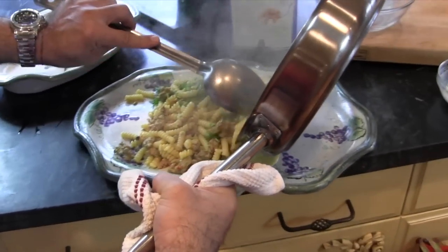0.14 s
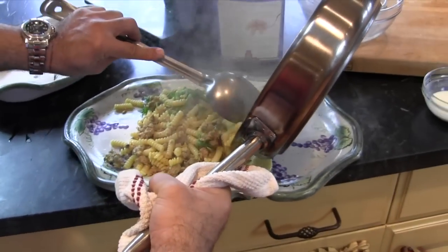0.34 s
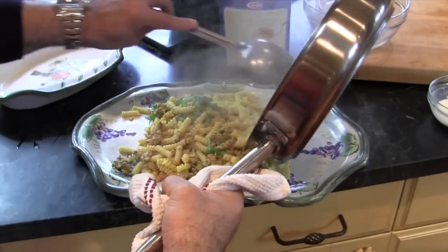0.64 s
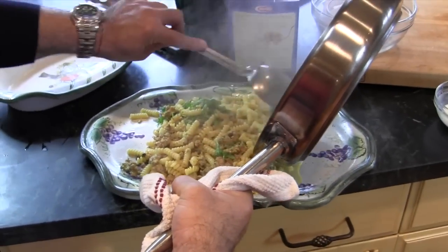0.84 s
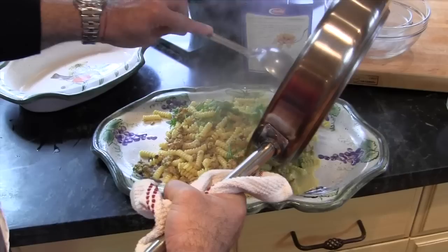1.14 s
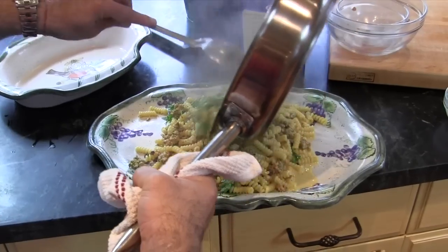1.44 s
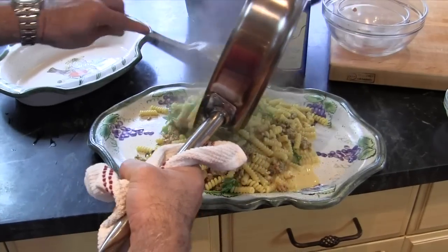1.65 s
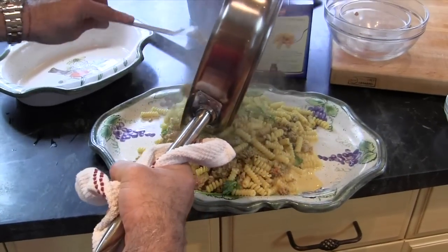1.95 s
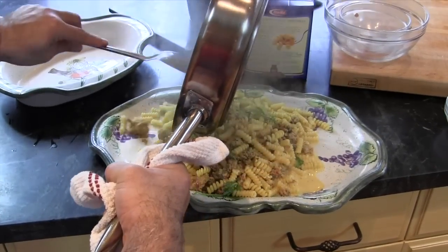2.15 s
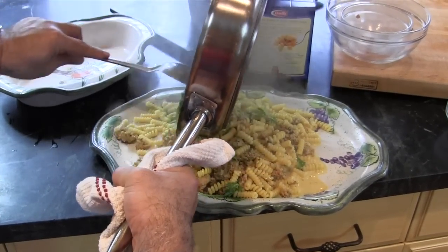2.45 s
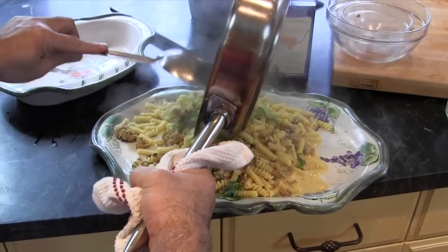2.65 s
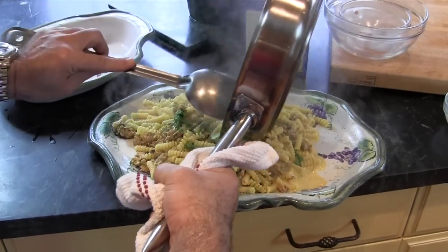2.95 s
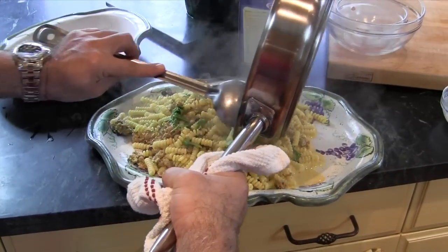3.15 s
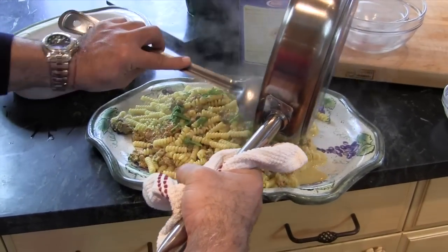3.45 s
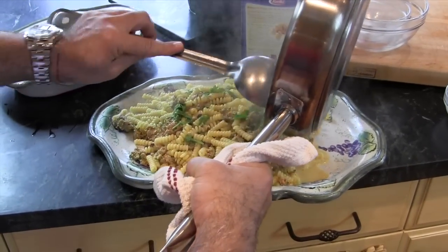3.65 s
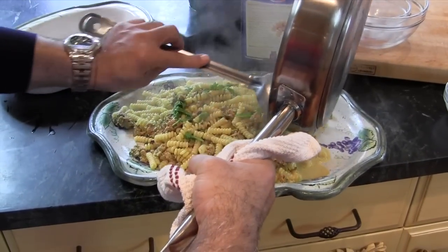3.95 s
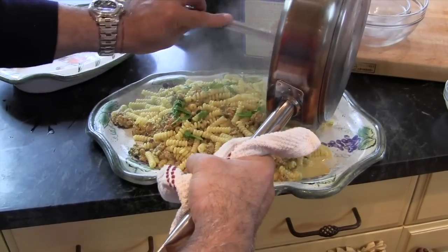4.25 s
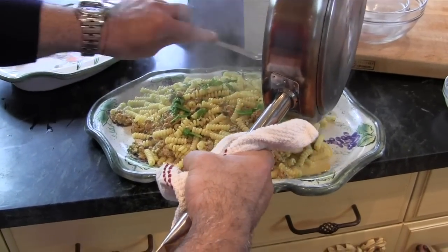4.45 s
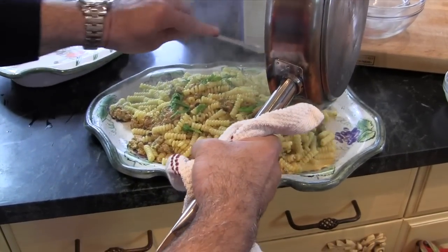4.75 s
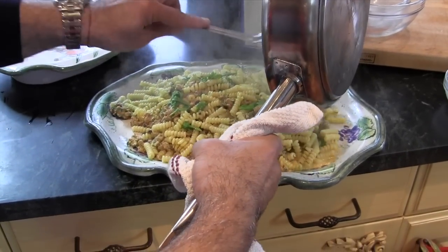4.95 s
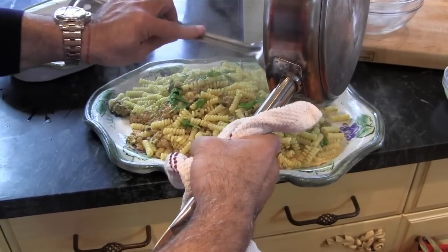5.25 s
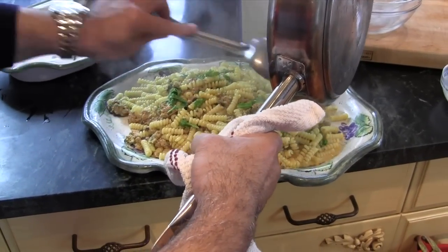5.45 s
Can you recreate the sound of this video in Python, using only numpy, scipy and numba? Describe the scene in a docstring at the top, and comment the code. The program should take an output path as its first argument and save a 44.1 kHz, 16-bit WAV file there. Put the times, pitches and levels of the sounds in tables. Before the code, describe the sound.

In a small hard-surfaced kitchen, close to the camera, about two seconds of quiet pass with soft wet pasta ticks and dull dish nudges on a counter. Then a metal ladle strikes a tilted steel pan in sharp, irregular clanks, with short gritty scrapes following many blows. The clanks become denser and brighter toward the end, over faint hiss and low hum.

```python
"""A metal ladle knocks on and scrapes along a tilted steel pan in a small hard kitchen, a metre from a camera.
Blows are short bursts of force and scrapes are stick-slip noise; both drive one bank of decaying pan modes.
Before most of the blows pasta slides with wet ticks, summed from tiny partials, and nudges ring the dish on
the counter as a few low modes. Under it all lie a quiet filtered-noise hiss and a narrow appliance hum."""
import sys
import numpy as np
from scipy import signal
from scipy.fft import rfft, irfft
from scipy.io import wavfile
from scipy.ndimage import uniform_filter1d
from numba import njit

SR = 44100
rng = np.random.default_rng(int(sys.argv[2]) if len(sys.argv) > 2 else 0)


def how_loud(loudness_db):
    """Turn decibels into a plain amplitude multiplier (0 dB gives 1, 20 dB gives 10)."""
    steps = np.asarray(loudness_db, float) / 20
    return 10 ** steps


def to_wav(sig):
    """Store sig (one row per channel, or 1-D mono) as 16-bit WAV at the path in sys.argv[1].

    Samples outside -1..1 are clipped; the rate is SR.
    """
    pcm = np.clip(np.atleast_2d(sig), -1, 1) * 32767
    pcm = np.round(pcm).astype(np.int16)
    wavfile.write(sys.argv[1], SR, pcm.T)  # frames by channels


N = 246959


def read(table, hz, axis=1):
    """Interpolation on a logarithmic frequency axis: one column of a table at the given frequencies."""
    rows = np.array(table, float)
    return np.interp(np.log(np.maximum(hz, 1.0)), np.log(rows[:, 0]), rows[:, axis])


def colour(x, table):
    """Zero-phase filtering: multiply the spectrum by a curve of (frequency [Hz], level [dB])."""
    n = x.shape[-1]
    hz = np.arange(n // 2 + 1) * SR / n
    return irfft(rfft(x) * how_loud(read(table, hz)), n)


def set_rms(x, db):
    """Root-mean-square normalisation to a level in dB."""
    return x * how_loud(db) / np.sqrt(np.mean(x ** 2))


def walk(rate):
    """Smoothed random process: levels held for 1 / rate seconds, then slewed; spread near 1."""
    hold = int(SR / rate)
    steps = np.repeat(rng.standard_normal(N // hold + 1), hold)
    return 0.87 * uniform_filter1d(uniform_filter1d(steps, hold), hold)[:N]


@njit
def ring(force, poles, weights):
    """Modal superposition: decaying resonators, each driven by its own mix of the force rows."""
    out = np.zeros(force.shape[1])
    for m in range(len(poles)):
        push = np.full(len(out), 1e-18)
        for b in range(len(force)):
            if weights[m, b] != 0:
                push += weights[m, b] * force[b]
        z = 0j
        for i in range(len(out)):
            z = z * poles[m] + push[i]
            out[i] += z.imag
    return out


def poles_of(hz, t60):
    """Exponential decay: the complex turn and shrinkage of each mode in one sample."""
    return np.exp(2j * np.pi * hz / SR - np.log(1000) / (t60 * SR))


def burst(seconds, size=512):
    """Contact chatter: noise of unit energy that decays by 1/e in the given time."""
    chatter = rng.standard_normal(size) * np.exp(-np.arange(size) / (seconds * SR))
    return chatter / np.sqrt(np.sum(chatter ** 2))


# spectrum of the room hiss: (frequency [Hz], relative level [dB per Hz])
HISS_SPECTRUM = [(15, -53), (25, -41.5), (70, -32.5), (114, -5), (195, 3), (503, -2), (677, -2.5),
                 (1160, -5.5), (2110, -7.5), (2760, -10.5), (4030, -11), (13600, -23.5), (16000, -35)]


def kitchen():
    """Filtered noise and a resonance fed by noise: drifting hiss and wavering hum, nearly alike left and right."""
    hiss_db = -59
    drift = how_loud(0.8 * walk(4) + 0.7 * walk(20))
    mid, side = colour(rng.standard_normal((2, N)), HISS_SPECTRUM) * drift
    # a 128 Hz mode with a decay time of 0.4875 s
    hum_pole = poles_of(np.array([128]), np.array([0.4875]))
    hum = ring(rng.standard_normal((1, N)), hum_pole, np.ones((1, 1)))
    mid = set_rms(mid, hiss_db) + set_rms(hum, -69.5)
    side = set_rms(side, hiss_db - 6.5)
    return np.array([mid + side, mid - side])


# dull nudges of the dish on the counter: (time [s], force level [dB])
NUDGES = [(0.039, -47), (0.089, -39.5), (0.282, -45.5), (0.57, -35.5), (0.589, -34.5), (0.612, -34.5),
          (0.636, -33), (0.655, -38.5), (0.674, -44), (0.715, -40), (1.099, -43), (1.36, -44), (1.892, -41),
          (2.763, -45)]
# low modes of dish and counter: (frequency [Hz], level [dB], decay time t60 [s])
DISH_MODES = [(140, -7.5, .15), (262, -12.5, 0.098), (358, -15, 0.031), (606, -8, 0.049),
              (677, -13.5, 0.17), (850, -19.5, 0.036), (1790, -17, 0.024)]


def dish():
    """Impulsive excitation of modes: soft nudges ring the low modes of dish and counter."""
    force = np.zeros((1, N))
    for s, force_db in NUDGES:
        i = int(s * SR)
        force[0, i:i + 512] += how_loud(force_db) * burst(0.007)
    hz, db, t60 = np.array(DISH_MODES, float).T
    return ring(force, poles_of(hz, t60), how_loud(db).reshape(-1, 1))


# wet ticks of sliding pasta: (time [s], level of the main partial [dB], centre frequency [Hz], decay time t60 [s])
TICKS = [(0.0409, -44.5, 1760, 0.0088), (0.3808, -45, 1540, 0.0086), (0.4828, -52.5, 6260, 0.015),
         (0.5713, -43.5, 1730, 0.0069), (0.6733, -40.5, 3100, 0.013), (1.127, -48, 2390, 0.014),
         (1.4088, -43, 2900, 0.017), (1.6154, -36, 3100, 0.012), (1.6198, -39, 2070, 0.0084),
         (1.6287, -39, 3650, 0.009), (1.7397, -37.5, 3370, 0.01), (1.77, -48.5, 2330, 0.015),
         (1.929, -47.5, 8000, 0.012), (1.9444, -49, 3390, 0.0089)]


def pasta():
    """Additive synthesis: each wet tick is a cluster of tiny decaying partials; 60 faint ones fall at random."""
    out, t = np.zeros(N), np.arange(2048) / SR
    draws = rng.random((60, 3))
    faint = [(2.3 * a, -66 + 9 * b, 1500 * how_loud(8.9 * c), 0.008) for a, b, c in draws]
    for s, tick_db, hz, t60 in list(TICKS) + faint:
        partials = np.minimum(hz * np.array([0.62, 0.8, 1, 1.17, 1.55, 2.2]), 15000)
        sizes = np.array([0.33, 0.55, 1, 0.6, 0.46, 0.15]) * rng.choice([-1.0, 1.0], 6)
        tone = sizes @ np.sin(2 * np.pi * partials[:, None] * t)
        decay = np.exp(-np.log(1000) * t / t60)
        i = int(s * SR)
        out[i:i + len(t)] += how_loud(tick_db) * tone * decay
    return out


# reverberation of the kitchen: (frequency [Hz], decay time t60 [s])
ROOM_T60 = [(200, 0.38), (600, 0.66), (1500, 0.49), (4000, 0.51), (10000, 0.32)]
# left-right difference of the reverberation: (frequency [Hz], level [dB])
SIDE_TILT = [(100, -7), (1500, -9.5), (5000, -3.5), (12000, 1.5)]


def room(x):
    """Diffuse reverberation: direct sound plus a noise tail whose bands each decay at their own rate."""
    size = SR * 3 // 4
    t, hz = np.arange(size) / SR, np.arange(size // 2 + 1) * SR / size
    noise, tail = rfft(rng.standard_normal((2, size))), 0
    centres = np.log([row[0] for row in ROOM_T60])
    for (_, t60), row in zip(ROOM_T60, np.eye(len(ROOM_T60))):
        band = irfft(noise * np.interp(np.log(hz + 1), centres, row), size)
        tail = tail + band * np.exp(-np.log(1000) * t / t60)
    # the first walls answer after a few ms
    tail = tail * np.clip((t - 0.002) / 0.0024, 0, 1)
    mid, side = tail / np.sqrt(np.sum(tail[0] ** 2))
    wet_mid = how_loud(-5.5) * signal.fftconvolve(x, mid)[:N]
    wet_side = how_loud(-12) * colour(signal.fftconvolve(x, side)[:N], SIDE_TILT)
    return np.array([x + wet_mid + wet_side, x + wet_mid - wet_side])


# bands in which a contact's force is set: centre frequency [Hz]
BANDS_HZ = [600, 1750, 2900, 4900, 9500]
# swing of each band with the place of contact: size [dB]; place where it is strongest [degrees]
BAND_PLACE_DB = [1.38, 0.1, 2.43, 1, 1.2]
BAND_BEST_DEG = [165, 200, 13, 222, 240]


def band_db(base_db, tilt, degrees):
    """Contact spectrum: a common colour, tilted by hardness and swung by the place on the pan."""
    octaves = np.log2(np.array(BANDS_HZ) / BANDS_HZ[1])
    angle = np.radians(np.subtract.outer(degrees, BAND_BEST_DEG))
    return np.array(base_db) + tilt * octaves + np.array(BAND_PLACE_DB) * np.cos(angle)


CROWD_PER_RING = -0.24  # dB per dB of clear ring: a free pan clatters less
# ladle blows: (time [s], force level [dB], hardness as treble tilt [dB per octave], clear ring [dB],
# place round the pan [degrees])
BLOWS = [(2.0791, -11.5, -1.5, -7, 96), (2.4494, -11, -0.3, -2, 48), (3.1493, -11, 0.04, -6, 127),
         (3.2095, -27, -1.76, 12, 5), (3.4223, -23, 0.66, 5, 354), (3.8186, -12, 1.17, -8, 112),
         (3.985, -35, 0.3, -12.5, 390), (4.0993, -26.5, -4.5, -0.1, 270), (4.3818, -15, 2.43, 1.5, 350),
         (4.466, -28, 0, 7.5, 310), (4.524, -25.5, -0.7, 5.5, 300), (4.7819, -12, 0.27, 1.5, 238),
         (5.1243, -18, 2.1, 5.5, 5), (5.219, -22.5, 0.5, 2.5, 234), (5.4586, -11, 1.2, 5, 228)]
# colour of a blow before the tilt: level per band [dB]
BLOW_COLOUR_DB = [-13.5, 0.5, -2, -3, -6]


def blows():
    """Impact excitation: a sharp push and chatter per blow, the crack, and the contact's place and clear ring."""
    slide_deg_s, crack_s = 90, 0.0017
    force, crack = np.zeros((N, 5)), np.zeros(N)
    place, ring_db = np.zeros(N), np.zeros((N, 1))
    for s, force_db, tilt, clear_db, degrees in BLOWS:
        i = int(s * SR)
        # the ladle drags on from where it landed
        place[i:] = degrees + slide_deg_s * np.arange(N - i) / SR
        ring_db[i:] = clear_db
        bands = how_loud(force_db + band_db(BLOW_COLOUR_DB, tilt, degrees))
        push = 0.86 * burst(0.003)
        push[0] += 1
        force[i:i + 512] += push[:, None] * bands
        # the crack follows the three upper bands
        crack_size = np.sqrt(crack_s * SR * np.sum(bands[2:] ** 2)) * how_loud(CROWD_PER_RING * clear_db)
        crack[i:i + 512] += burst(crack_s) * crack_size
    snap = colour(crack, [(300, -21), (1200, -42), (4500, -1.0), (9000, -3.5), (16000, -37.5)])
    return force, how_loud(-2) * snap, place, ring_db


def shake(hz, db, t60, best, blow, drag, place, depth):
    """Modal excitation by blows and rubbing given per band; the place of contact picks the modes."""
    gain = how_loud(db) * rng.choice([-1.0, 1.0], len(hz))
    # each mode belongs to the two nearest bands
    share = np.transpose([np.interp(np.log(hz), np.log(BANDS_HZ), row) for row in np.eye(5)])
    share = share * gain[:, None]
    # a blow is felt by mode size, a steady rub also by how long the mode rings
    struck = blow / np.sqrt(np.sum(share ** 2, axis=0))
    ring_samples = t60[:, None] * SR / (4 * np.log(1000))
    rubbed = drag / np.sqrt(np.sum(share ** 2 * ring_samples, axis=0))
    force = (struck + rubbed).T
    # each mode feels 1 + depth * cos(place - best), written out as three parts
    here, best = np.radians(place), np.radians(best)[:, None]
    force = np.vstack([force, force * np.cos(here), force * np.sin(here)])
    share = np.hstack([share, depth * share * np.cos(best), depth * share * np.sin(best)])
    return ring(np.ascontiguousarray(force), poles_of(hz, t60), np.ascontiguousarray(share))


# short pan modes, spread over the range and louder in a few regions:
# (frequency [Hz], level of each mode [dB], decay time t60 [s])
CROWD = [(260, -26.5, 0.044), (710, -14, 0.076), (1230, -4.5, 0.029), (1550, 2, 0.051), (2020, 6.5, 0.032),
         (2340, -2, 0.026), (3100, 1.5, 0.057), (3770, -2, 0.03), (4750, 8.5, 0.053), (5660, -1, 0.049),
         (6600, -2, 0.067), (7050, -5.5, 0.041), (8400, -9, 0.056), (11500, -15.5, 0.076),
         (13000, -19, 0.031), (14800, -32, .015), (16000, -43.5, 0.014)]


def crowded_modes(blow, drag, place, ring_db):
    """High modal density: 240 short modes clatter, less under blows that leave the pan free to ring."""
    hz = 250 + 15700 * ((np.arange(240) + rng.random(240)) / 240) ** 1.4
    db, t60 = read(CROWD, hz), read(CROWD, hz, axis=2)
    return shake(hz, db, t60, 0 * hz, blow * how_loud(CROWD_PER_RING * ring_db), drag, place, 0)


# pitches of the clear pan modes, lower and upper: frequency [Hz]
PAN_HZ = [308, 490, 694, 950, 1104, 1294, 1470, 1537, 1598, 1690, 1912, 1961, 2010, 2200, 2354, 2492]
PAN_HIGH_HZ = [2617, 2730, 2792, 3050, 3105, 3295, 3791, 4032, 4435, 4570, 4890, 6180, 6500, 8210, 10650]
# the same modes in order: (level [dB], decay time t60 [s], place where a blow excites it best [degrees])
PAN_MODES = [(-5, 0.34, 150), (-20, 0.56, 194), (-4, 0.15, 25), (-2, 0.043, 340), (-11.5, 0.35, 188),
             (-5.5, 0.11, 170), (-5, 0.16, 62), (2, 0.14, 190), (-0.5, 0.19, 360), (-12.5, 0.42, 5),
             (-1, 0.085, 86), (1, 0.14, 347), (-7.5, 0.2, 287), (-18.5, 0.11, 95), (-9.5, 0.14, 226),
             (-18.5, 0.24, 420), (-7.5, 0.18, 160), (-2.5, 0.15, 355), (-13.5, 0.086, 160), (-6, 0.15, 91),
             (0.5, 0.095, 18), (-6, 0.045, 250), (-10, 0.2, 305), (-15.5, 0.16, 130), (-2.5, 0.059, 246),
             (-1, 0.1, 54), (-9, 0.094, 77), (-8.5, 0.11, 420), (-24, 0.16, 34), (-12, 0.1, 64),
             (-15.5, 0.067, 60)]
# share of each band's force that the clear modes carry: level [dB]
CLEAR_DB = [-9, -5, -5.5, -9.5, -10]


def clear_modes(blow, drag, place, ring_db):
    """Lightly damped resonance: the pan's clear modes ring as far as food and ladle leave them free."""
    hz = np.array(PAN_HZ + PAN_HIGH_HZ, float)
    db, t60, best = np.transpose(PAN_MODES)
    free_blow = blow * how_loud(ring_db + np.array(CLEAR_DB))
    # a scrape follows 0.37 of its blow's clear ring in dB
    free_drag = drag * how_loud(5 + 0.37 * ring_db + np.array(CLEAR_DB))
    return shake(hz, db, t60, best, free_blow, free_drag, place, 0.9)


# ladle rim dragged over the steel: (start time [s], length [s], force level [dB],
# level change over the stroke [dB], treble tilt [dB per octave])
SCRAPES = [(3.162, 0.039, -29, -1, -4.5), (3.836, 0.1, -22, -5, 3), (3.971, 0.015, -30.5, -2.3, -1.5),
           (4.115, 0.026, -31.5, -7.5, -7), (4.439, 0.1, -25.5, 1.5, -0.5), (4.789, 0.0315, -18, -6.5, 3.1),
           (5.125, 0.074, -20, -3.5, 2), (5.218, 0.048, -20.5, -5, 5), (5.489, .13, -19, -6, 2.8)]
# colour of a scrape before the tilt: level per band [dB]
SCRAPE_COLOUR_DB = [-11.5, 0.5, -3, -6.5, -10.5]
HOLLOW_HZ, HOLLOW_RISE_HZ_S = 722, 3000


def scrapes(place):
    """Stick-slip friction: uneven noise under the rim's pressure, and the hollow's pitch along each stroke."""
    attack_s, lift_db_s = 0.008, 297.5
    drag, hollow_hz = np.zeros((N, 5)), np.full(N, float(HOLLOW_HZ))
    for s, length, stroke_db, change_db, tilt in SCRAPES:
        at = slice(int(s * SR), min(int((s + length + 60 / lift_db_s) * SR), N))
        t = np.arange(at.stop - at.start) / SR
        # the rim bites, presses on, mostly easing steadily, then lifts off
        press_db = stroke_db + change_db * np.minimum(t / length, 1) - lift_db_s * np.maximum(t - length, 0)
        press = np.minimum(t / attack_s, 1) * how_loud(press_db)
        drag[at] += press[:, None] * how_loud(band_db(SCRAPE_COLOUR_DB, tilt, place[at]))
        # the bowl tips open along the stroke
        hollow_hz[at] = HOLLOW_HZ + HOLLOW_RISE_HZ_S * np.minimum(t, length)
    # dense catches of very uneven size, coming in flurries
    catch_db = 4.4 * np.minimum(rng.exponential(size=N), 5) + 2 * walk(70)
    grit = rng.standard_normal(N) * how_loud(catch_db)
    return drag * set_rms(grit, -9.5)[:, None], hollow_hz


def hollow(rub, hz):
    """Gliding cavity resonance, 35 Hz wide: the hollow between ladle bowl and pan, fed by the rubbing."""
    turn = np.exp(2j * np.pi * np.cumsum(hz) / SR)
    keep = np.exp(-np.pi * 35 / SR)
    return np.imag(turn * signal.lfilter([np.sqrt(1 - keep ** 2)], [1, -keep], rub / turn))


def pan():
    """Linear superposition: blows and scraping shake the same crowded and clear modes, plus crack and hollow."""
    blow, snap, place, ring_db = blows()
    drag, hollow_hz = scrapes(place)
    crowd = crowded_modes(blow, drag, place, ring_db)
    clear = clear_modes(blow, drag, place, ring_db)
    rub = drag[:, 1]
    bowl = hollow(rub, hollow_hz) + how_loud(1) * hollow(rub, 1.9 * hollow_hz)
    return crowd + clear + snap + how_loud(-7.5) * bowl


def scene():
    """Linear mixing: a high-pass thins the bass; pan, dish and pasta excite one room."""
    ticks = pasta()
    near = pan() + dish() + 0.5 * ticks
    bass_cut = signal.butter(3, 276, "highpass", fs=SR, output="sos")
    near = signal.sosfilt(bass_cut, near)
    # the pasta faces the camera and is shaded from the walls, so it sounds drier
    return room(near) + 0.8 * ticks + kitchen()


def low_pass(x):
    """Removes everything above the highest recorded frequency."""
    return signal.sosfilt(signal.butter(12, 16530, fs=SR, output="sos"), x)


def record(dry):
    """Soft saturation: the camera rounds the loudest peaks."""
    mix = np.tanh(0.67 * dry) / 0.74
    return low_pass(mix)


dry = scene()
out = record(dry)
to_wav(out)
```